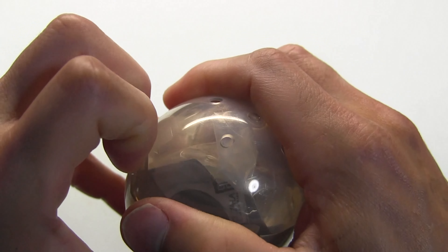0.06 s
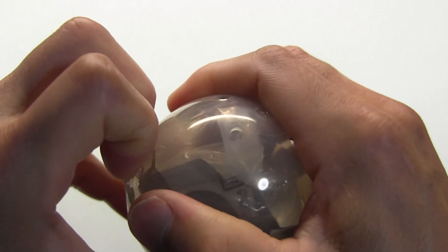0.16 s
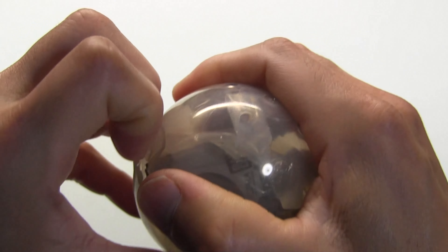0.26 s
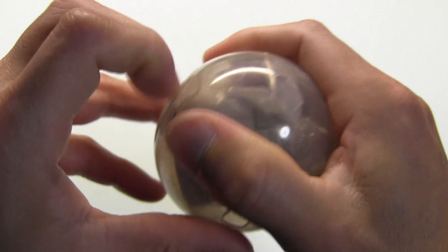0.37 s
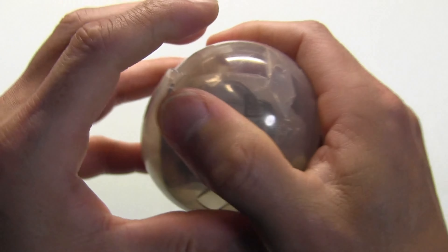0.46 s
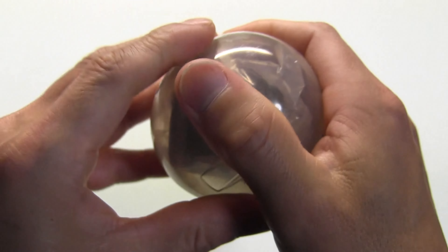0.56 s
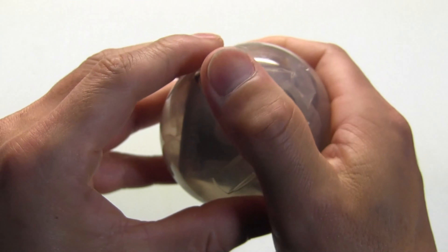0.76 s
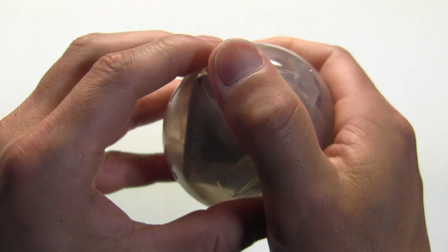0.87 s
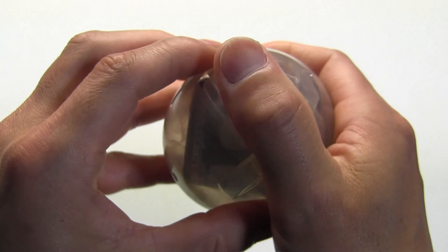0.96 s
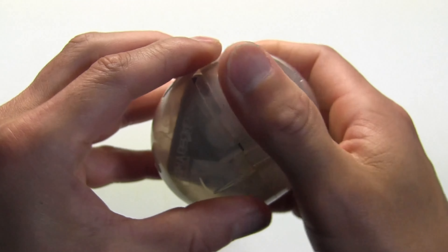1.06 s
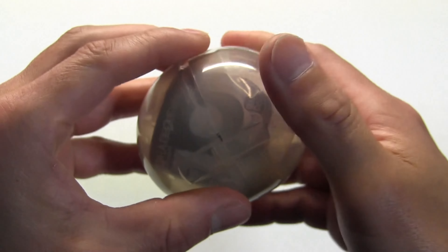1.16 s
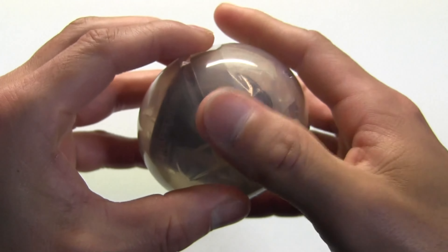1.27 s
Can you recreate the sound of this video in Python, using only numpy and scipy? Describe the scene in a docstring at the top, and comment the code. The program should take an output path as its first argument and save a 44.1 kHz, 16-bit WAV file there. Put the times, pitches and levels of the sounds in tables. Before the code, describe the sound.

A hollow plastic capsule snaps in someone's hands, first with a deep pop, then a bright crack. Its halves tick as they settle while fingers rub faintly on the shell, close up in a quiet room.

```python
"""Two hands squeeze and twist a hollow plastic capsule close by, over a quiet room's hiss and hum.
Fingers slide on the shell with stick-slip friction. At 0.21 s the seam snaps with a deep pop,
and at 0.43 s with a bright crack; each impulse excites the shell's damped modes.
The halves then tick as they settle, and the fingers slide again among a last few ticks.
Every snap and tick leaves a short, soft reverberant tail."""
import sys
import numpy as np
from scipy import signal
from scipy.fft import rfft, irfft
from scipy.io import wavfile

SR = 44100
rng = np.random.default_rng(int(sys.argv[2]) if len(sys.argv) > 2 else 0)


def generate_wav(signal):
    """Clip the signal to [-1, 1] and save it as 16-bit WAV at the path in sys.argv[1]."""
    frames = np.transpose(np.atleast_2d(signal))
    scaled = np.clip(frames, -1, 1) * 32767
    pcm = np.round(scaled).astype(np.int16)
    wavfile.write(sys.argv[1], SR, pcm)


N = 57330
T = np.arange(N) / SR
HZ = np.fft.rfftfreq(N, 1 / SR)


def amp(db):
    """Amplitude ratio of a level in decibels."""
    return 10 ** (np.asarray(db) / 20)


def curve_at(points, hz):
    """Interpolation on a logarithmic frequency axis."""
    point_hz, value = np.transpose(points)
    return np.interp(np.log(hz + 1), np.log(point_hz + 1), value)


def unit_energy(x):
    """Normalisation to an energy of one."""
    return x / np.sqrt(np.sum(x ** 2) + 1e-20)


def colour(x, gain_db):
    """Zero-phase filtering by a gain at each frequency."""
    return irfft(rfft(x) * amp(gain_db), N)


def add(mix, start_s, sound):
    """Superposition of a sound from its start time."""
    part = mix[max(round(start_s * SR), 0):][:len(sound)]
    part += sound[:len(part)]


def octaves(hz):
    """Octaves above 1 kHz, constant below 250 Hz."""
    return np.log2(np.maximum(hz, 250) / 1000)


# spectrum of the room's hiss: frequency_hz, gain_db
HISS_SPECTRUM = [(15, -39.5), (32, -20.5), (60, -9), (110, -7.5), (200, -7), (350, -3.5), (470, -9.5),
                 (730, -7.5), (1000, -12), (2000, -14.5), (2600, -14), (4000, -19.5), (6500, -21.5),
                 (8200, -24.5), (12000, -30), (16000, -32.5)]
# bands of the room's hum: pitch_hz, level_db
HUM_BANDS = [(59, -80.5), (150, -74), (245, -75), (272, -72)]

def background(hiss_db=-62.5, hum_width_hz=13):
    """Broadband noise is heard as hiss, narrowband noise as a wavering hum."""
    out = amp(hiss_db) * unit_energy(colour(rng.standard_normal(N), curve_at(HISS_SPECTRUM, HZ)))
    for pitch_hz, level_db in HUM_BANDS:
        band_db = -20 * np.log10(1 + (2 * (HZ - pitch_hz) / hum_width_hz) ** 2)
        out += amp(level_db) * unit_energy(colour(rng.standard_normal(N), band_db))
    return out * np.sqrt(N)


# finger strokes: start_s, length_s, level_db, rise_fraction, tilt_db_per_octave
STROKES = [(-.02, 0.065, -68.5, 0.33, 6.5), (0.143, 0.077, -60, 0.7, 0.5), (0.378, 0.082, -49.5, 1, -1),
           (0.46, 0.23, -65, 0.37, 2), (0.616, 0.13, -64.5, 0.23, -18), (0.851, 0.087, -55, 0.66, 0),
           (0.934, .10, -60.5, 0.17, -0.5), (1.066, 0.031, -62, 0.82, -0.5),
           (1.122, 0.069, -59.5, 0.3, 5.5), (1.168, 0.066, -59, 0.44, 3), (1.217, 0.082, -64.5, 0.6, 8.5)]
# spectrum of skin sliding on plastic: frequency_hz, gain_db
FRICTION_SPECTRUM = [(240, -55), (400, -21), (453, -6), (536, -30.5), (607, -5.5), (1010, -1), (1140, -9),
                     (1680, -4.5), (7990, -14.5), (16000, -35)]

def fingers(grains_per_s=12000, grain_spread_db=2.5, low_cut_hz=500):
    """Stick-slip friction: skin catches and slips in tiny grains as each stroke swells and fades."""
    out = np.zeros(N)
    bass_loss_db = 10 * np.log10(1 + (low_cut_hz / (HZ + 1)) ** 4)
    for start_s, length_s, level_db, rise, tilt in STROKES:
        grains = rng.standard_normal(N) * (rng.random(N) < grains_per_s / SR)
        grains *= amp(grain_spread_db * np.minimum(rng.exponential(1, N), 4))
        hiss = colour(grains, curve_at(FRICTION_SPECTRUM, HZ) + tilt * octaves(HZ) - bass_loss_db)
        ramp = np.interp((T - start_s) / length_s, [0, np.clip(rise, .05, .95), 1], [0, 1, 0])
        out += amp(level_db) * np.sin(ramp * np.pi / 2) * unit_energy(hiss) * np.sqrt(N)
    return out


def dispersed_click(db_at, tear_s, size=4096):
    """Dispersion: slow bending waves delay a click's bass, while tiny slips scatter its treble in time."""
    delay_at_1khz_s, slip_band_hz, tear_hz = .00039, 1400, 2000
    hz = abs(np.fft.fftfreq(size, 1 / SR))
    log_gain = np.log(amp(np.maximum(db_at(hz), -100)))
    spectrum = np.exp(np.conj(signal.hilbert(log_gain)))[:size // 2 + 1]  # minimum phase, so causal
    hz = hz[:size // 2 + 1]
    slips = np.interp(hz / slip_band_hz, np.arange(64), rng.random(64))
    scatter_s = tear_s * slips * hz ** 2 / (hz ** 2 + tear_hz ** 2)
    # phase is the integral of group delay over frequency
    bending_turns = 2 * delay_at_1khz_s * np.sqrt(1000 * hz)
    turns = bending_turns + np.cumsum(scatter_s) * SR / size
    return unit_energy(irfft(spectrum * np.exp(-2j * np.pi * turns))[:size // 2])


# modes of the shell: pitch_hz, relative_level_db, t60_s
SHELL_MODES = [(770, -13.5, 0.035), (927, -19, 0.088), (1840, -4.5, 0.17), (2440, 14.5, 0.017),
               (3655, -5, 0.036), (5652, -11, 0.046)]

def shell(click, cluster_db, modes_db=-22, cluster_t60_s=.022, cluster_rise_s=.0014, size=4096):
    """Modal response: a click rings a few clear modes and a dense cluster that the hands damp quickly."""
    t = T[:size]
    modes = sum(amp(db - 60 * t / t60) * np.sin(2 * np.pi * hz * t) for hz, db, t60 in SHELL_MODES)
    onset = 1 - np.exp(-(t / cluster_rise_s) ** 2)
    cluster = rng.standard_normal(size) * amp(-60 * t / cluster_t60_s) * onset
    out = amp(modes_db) * unit_energy(signal.fftconvolve(click, modes))
    out += amp(cluster_db) * unit_energy(signal.fftconvolve(click, cluster))
    add(out, 0, click)
    return out


# base spectrum of a tick: frequency_hz, gain_db
TICK_SPECTRUM = [(60, -24.5), (300, -16.5), (500, -15), (660, -1), (1080, 2.5), (1500, -4), (2400, -7.5),
                 (3400, -4), (4300, -15.5), (6000, -12.5), (8500, -14), (12500, -24), (16000, -37)]

def contact_db(hz, tilt, corner_hz, spot_hz, spot_db, soft_db=-8.5, half_width_octaves=.14):
    """Contact compliance cuts the treble; the touched spot adds a resonance or a notch."""
    softness = soft_db * (1 - 1 / (1 + (hz / corner_hz) ** 16))
    spot = spot_db / (1 + (np.log2((hz + 1) / spot_hz) / half_width_octaves) ** 2)
    return curve_at(TICK_SPECTRUM, hz) + tilt * octaves(hz) + softness + spot


# contacts of the halves: start_s, level_db, tilt_db_per_octave, corner_hz, spot_hz, spot_db
CONTACTS = [(.1530, -36.5, 4, 5000, 2220, 13), (.3130, -34.5, 6.5, 7500, 5960, 14),
            (0.3147, -34.5, 4, 7500, 2400, 14), (.4540, -25, 4, 8500, 1900, 16),
            (0.4757, -29.5, -3.5, 3490, 1010, -11), (0.5629, -21, 2, 3500, 2270, 2),
            (.5645, -24, -7, 3500, 3050, 10), (0.5665, -15, 0.5, 3500, 2280, 16.5),
            (0.5689, -19.5, 1, 3740, 1066, 9.5), (.5712, -27, 0, 3500, 3140, 6),
            (.5838, -27, -1, 3500, 3040, 9), (0.6019, -30, 5, 7000, 5600, 13),
            (0.6292, -27.5, 0, 3500, 1100, -2), (0.656, -31, -1, 8000, 690, 15),
            (.6612, -32, -4, 3200, 2500, 17), (.6655, -22, 3, 5130, 1190, 10.5),
            (0.693, -15.5, -2.5, 2630, 2350, 10.5), (0.7323, -28, -0.5, 3570, 1090, -1),
            (.7375, -26.5, -9, 2500, 684, 17), (.7610, -21, -0.5, 5950, 1056, 9),
            (.7850, -33, 0.5, 2500, 704, 13), (.8150, -35.5, -0.5, 3000, 1100, 3),
            (.8250, -33, -6, 2460, 755, 10), (1.089, -35.5, -6, 3000, 850, -2),
            (1.14, -36, -2.5, 9000, 370, 19), (1.2015, -31.5, 5.5, 3600, 3340, 7.5),
            (1.2108, -23.5, -2.5, 3100, 1120, -6.5), (1.238, -37, -8, 2500, 690, 7),
            (1.256, -34, -4, 2500, 1000, 8.5)]

def ticks(room_db=-17.5):
    """Impact excitation: the halves touch and ring the shell. Returns direct sound and room feed."""
    direct = np.zeros(N)
    for start_s, level_db, *contact in CONTACTS:
        click = dispersed_click(lambda hz: contact_db(hz, *contact), tear_s=.0012)
        add(direct, start_s, amp(level_db) * shell(click, cluster_db=-7.5))
    return direct, amp(room_db) * direct


# reverberation time of the room: frequency_hz, t60_s
TAIL_T60 = [(200, 0.16), (900, 0.2), (2500, 0.16), (5000, 0.25), (9000, 0.13), (14000, 0.37)]
# initial spectrum of its tail: frequency_hz, gain_db
TAIL_SPECTRUM = [(100, -4.5), (400, 3), (800, 0.5), (2200, 1.5), (5000, 1), (9000, -2), (14000, -1.5)]

def room(feed, rise_s=.006, decay_exponent=1.4, size=16384):
    """Reverberation: diffuse reflections hold briefly, then decay at a rate set by frequency."""
    hz, t, noise = signal.stft(rng.standard_normal(size), SR, nperseg=256)
    decay_db = 60 * (t / curve_at(TAIL_T60, hz)[:, None]) ** decay_exponent
    bands = noise * amp(curve_at(TAIL_SPECTRUM, hz)[:, None] - decay_db)
    tail = signal.istft(bands, SR, nperseg=256)[1][:size] * np.minimum(T[:size] / rise_s, 1)
    return signal.fftconvolve(feed, unit_energy(tail))[:N]


# snaps of the seam: start_s, level_db, cluster_db, room_db, tear_s
SEAM_SNAPS = [(0.2105, 13, -13, -22.5, 0.0011), (0.4348, 3, -8, -21.5, 0.00137)]
# spectra of the deep pop and the bright crack: frequency_hz, gain_db
POP_SPECTRUM = [(40, -24), (110, -25.5), (185, -29), (270, -20.5), (380, -12), (490, -11.5), (640, -2.5),
                (790, 1.5), (900, -3), (1010, -2), (1250, -14.5), (1500, -20), (1850, -11.5), (2400, -12),
                (3200, -21), (3700, -17.5), (4700, -27.5), (6800, -27.5), (8300, -23.5), (9500, -26),
                (10400, -42.5), (12500, -34), (16000, -52.5)]
CRACK_SPECTRUM = [(40, -28), (130, -25), (330, -19.5), (440, -9.5), (530, -13), (700, -2.5), (980, 0),
                  (1300, -6), (1600, -9.5), (1900, -7.5), (2650, -8), (3500, -18), (4200, -10.5),
                  (4800, -9.5), (5300, -11.5), (5900, -6.5), (6900, -10.5), (8300, -4), (9500, -12.5),
                  (10700, -20.5), (12400, -18.5), (16000, -40)]

def snaps():
    """Sudden release of strain at the seam rings the shell. Returns direct sound and room feed."""
    direct, feed = np.zeros((2, N))
    for event, spectrum in zip(SEAM_SNAPS, (POP_SPECTRUM, CRACK_SPECTRUM)):
        start_s, level_db, cluster_db, room_db, tear_s = event
        click = dispersed_click(lambda hz: curve_at(spectrum, hz), tear_s)
        snap = amp(level_db) * shell(click, cluster_db)
        add(direct, start_s, snap)
        add(feed, start_s, amp(room_db) * snap)
    return direct, feed


def scene(room_width=.32, background_width=.49):
    """Mid-side stereo: the capsule is central; uncorrelated tails and background add width."""
    direct, feed = np.add(snaps(), ticks())
    mid = direct + room(feed) + fingers() + background()
    side = room_width * room(feed) + background_width * background()
    return np.array([mid + side, mid - side])


# imbalance of the microphone ports: frequency_hz, left_minus_right_db
PORT_BALANCE = [(50, 1.5), (200, .5), (600, 1.36), (2000, .5), (5000, 0.4), (13000, -1)]

def record(dry, port_lag_s=4e-6, band_limit_hz=16200):
    """Transduction: two close ports, unequal in gain and delay, clip at full scale and are band-limited."""
    sign = np.array([[1], [-1]])
    ports = amp(sign * curve_at(PORT_BALANCE, HZ) / 2) * np.exp(1j * np.pi * sign * HZ * port_lag_s)
    clipped = np.clip(irfft(rfft(dry) * ports, N), -1, 1)
    lowpass = signal.firwin(255, band_limit_hz, window=("kaiser", 9), fs=SR)
    return signal.oaconvolve(clipped, lowpass[None], "same")


dry = scene()
out = record(dry)
generate_wav(out)
```